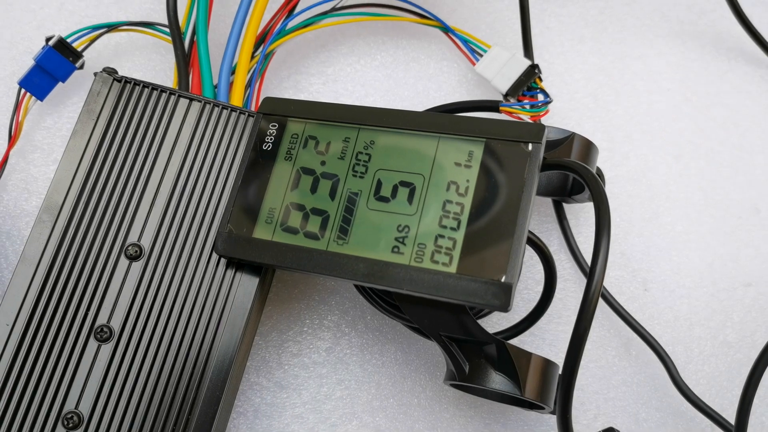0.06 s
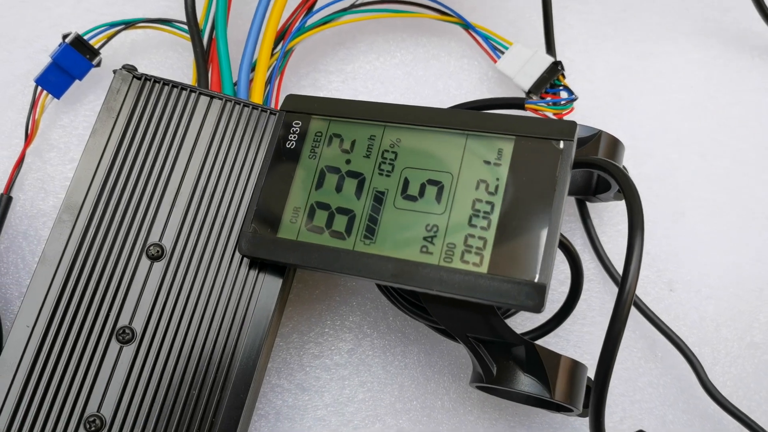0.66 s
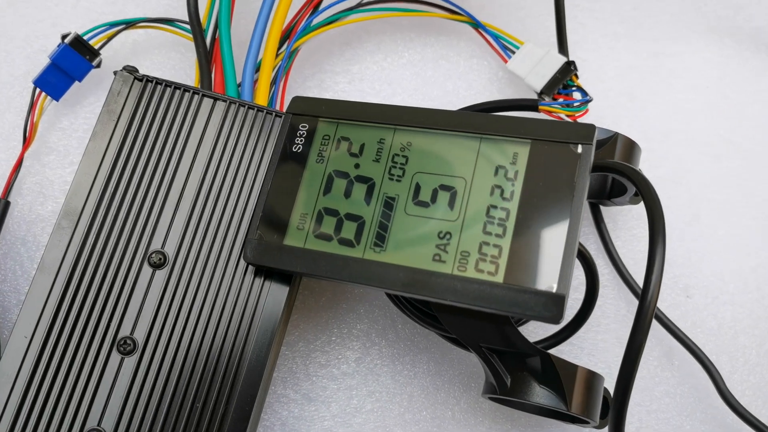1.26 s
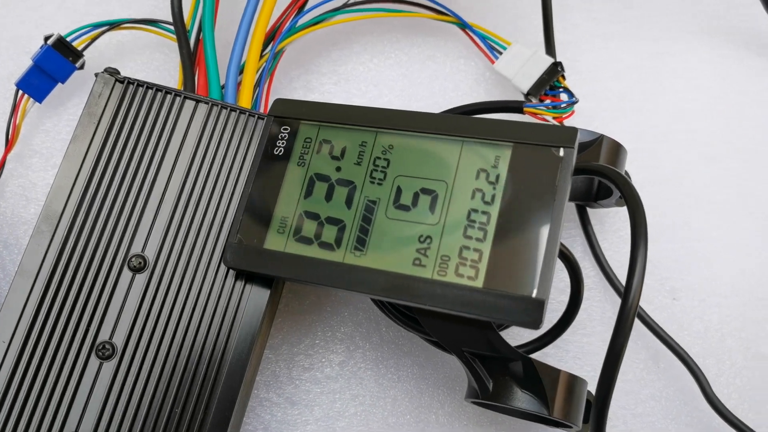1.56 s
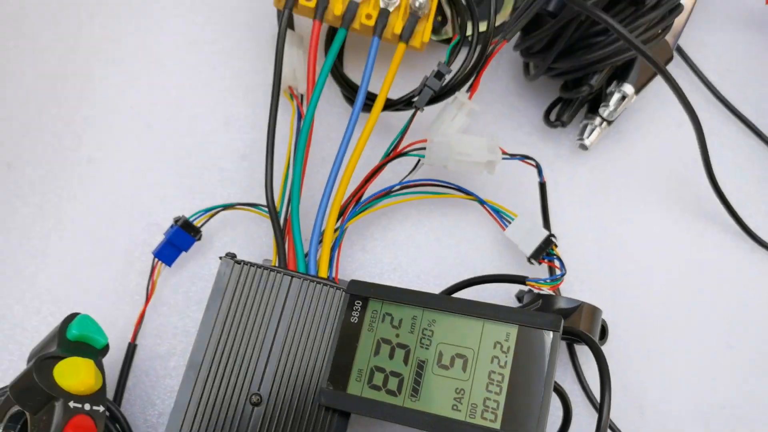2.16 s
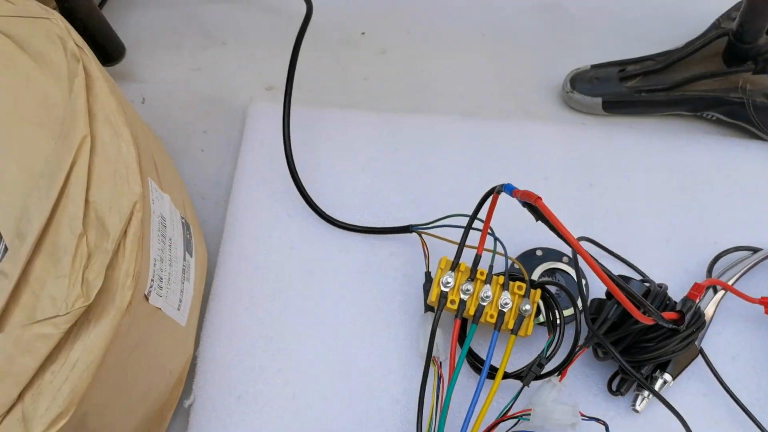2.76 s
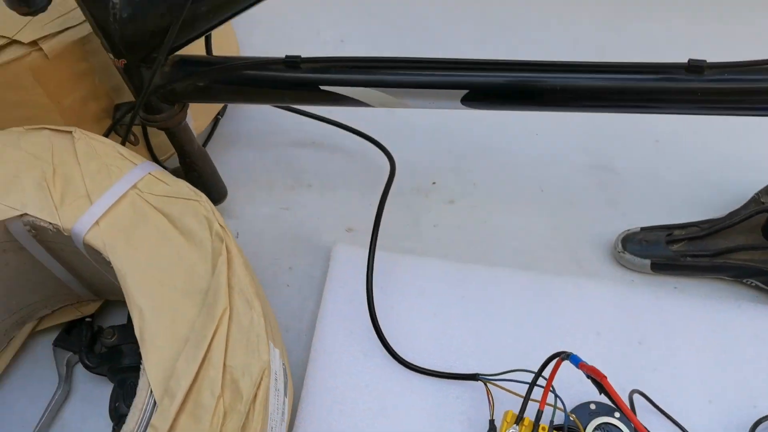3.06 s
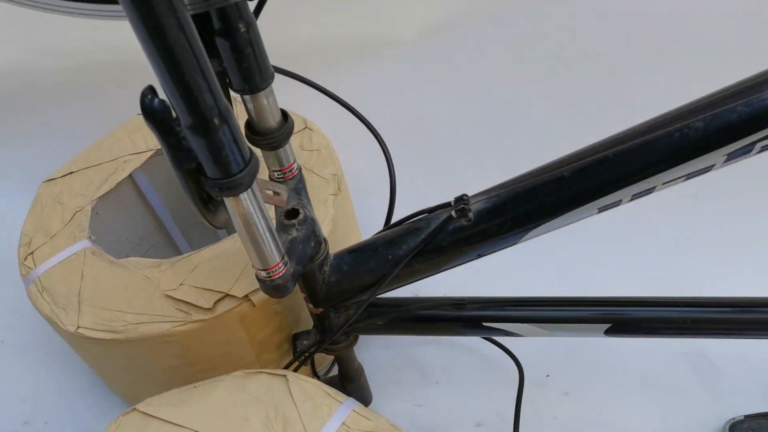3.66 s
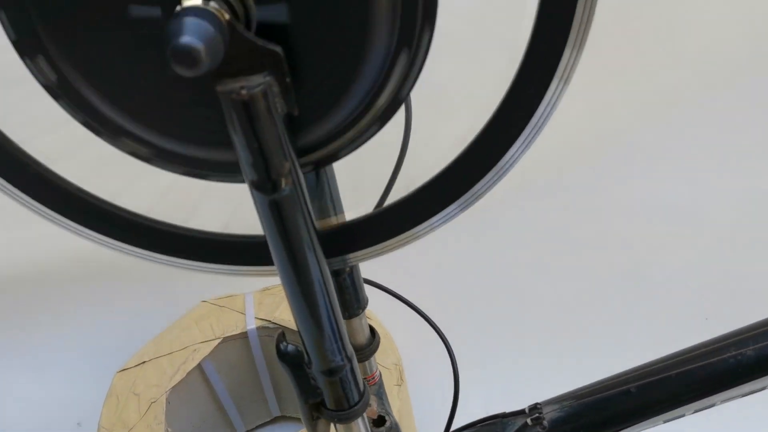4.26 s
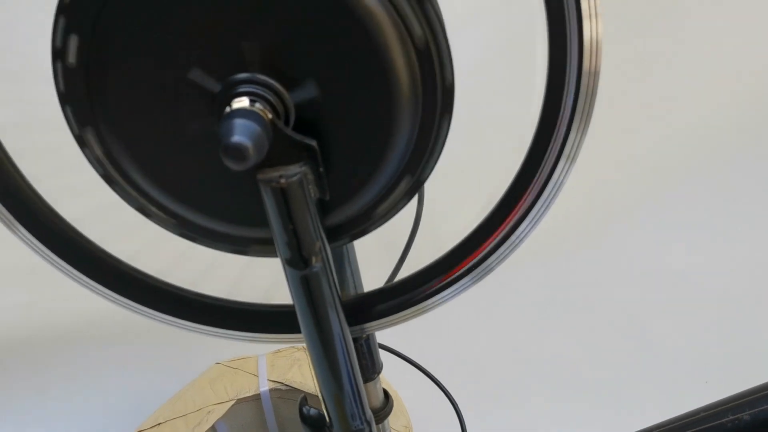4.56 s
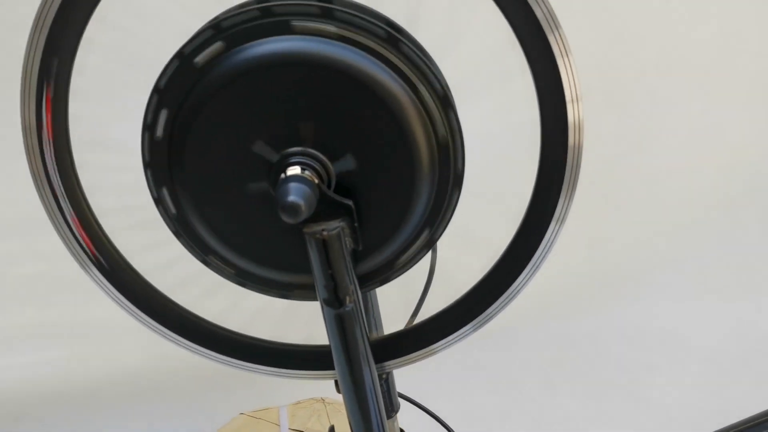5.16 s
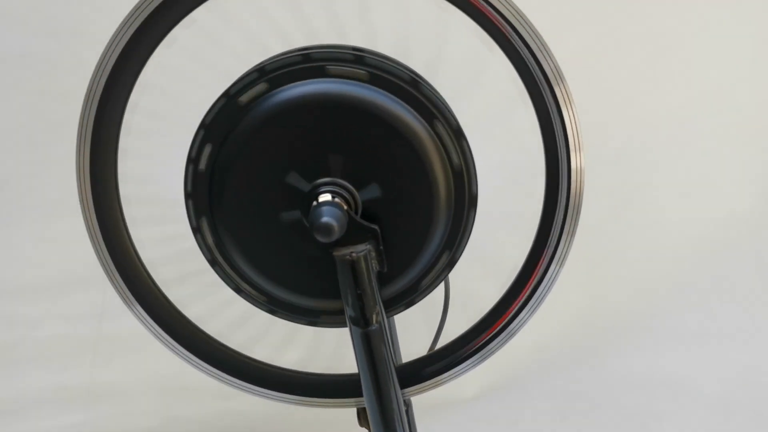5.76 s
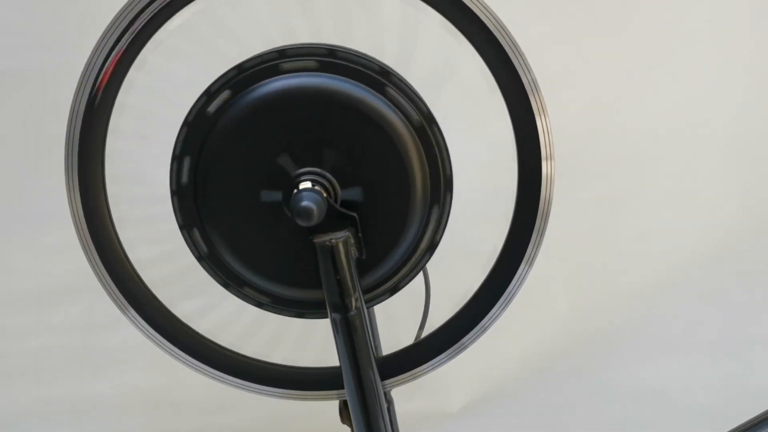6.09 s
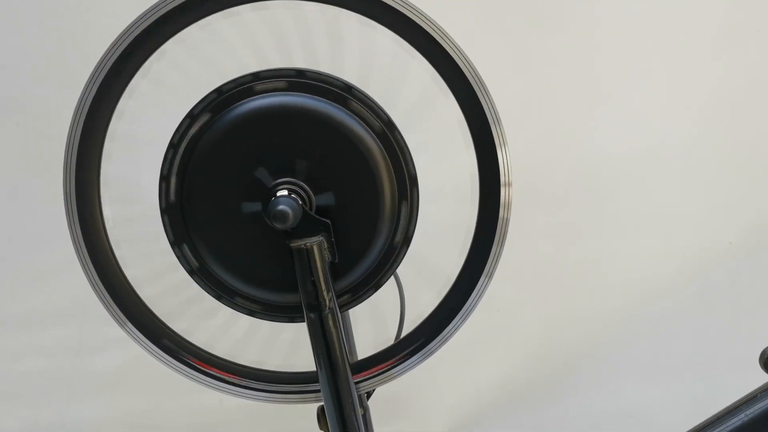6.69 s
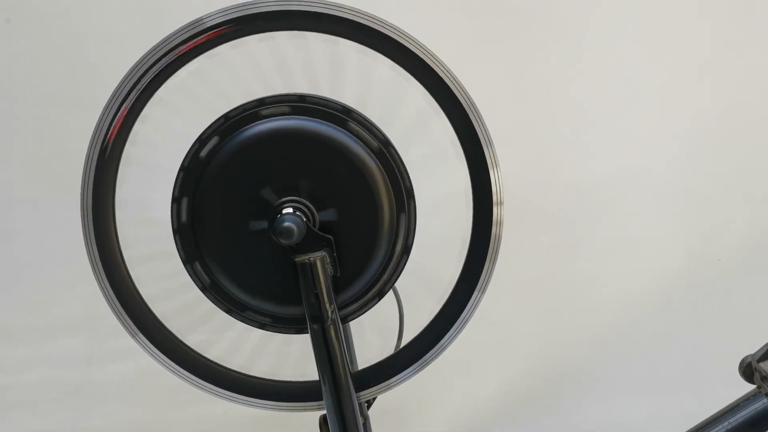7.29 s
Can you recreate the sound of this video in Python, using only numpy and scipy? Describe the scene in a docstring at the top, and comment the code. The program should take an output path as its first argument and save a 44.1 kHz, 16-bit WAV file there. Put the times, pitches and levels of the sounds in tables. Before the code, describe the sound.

An electric bicycle's hub motor spins a lifted wheel at a constant high speed in a small room. A steady hum, whines and a piercing high whistle sound over rushing air from the spokes, fine hiss and low rumble. The hand-held microphone moves closer, with a few dull bumps and one footstep. The whistle and rush grow louder, and two soft puffs of air hit the microphone.

```python
"""A steady hum, two whines and a piercing whistle sound over rushing air, a fine hiss and a low rumble.
An electric bicycle's hub motor is spinning its lifted wheel at top speed in a small room. The magnets
sing on whole multiples of the turning rate, the hub's shell whistles, and the spokes tear the air.
A hand-held microphone starts at the controller on the floor and is carried up close to the wheel,
with a few bumps and one footstep. There, two soft puffs of air from the wheel hit it."""
import sys
import numpy as np
from scipy import signal
from scipy.fft import rfft, irfft, next_fast_len
from scipy.io import wavfile
from scipy.ndimage import uniform_filter1d

SR = 44100
rng = np.random.default_rng(int(sys.argv[2]) if len(sys.argv) > 2 else 0)


def digitize_waveform(pressure):
    """Quantize a signal to 16-bit integers and store it at the path in sys.argv[1].

    Rows of a 2-D input are taken as channels; values are limited to [-1, 1].
    """
    field = np.atleast_2d(pressure).T
    bounded = np.clip(field, -1, 1)
    quanta = np.round(bounded * 32767).astype(np.int16)
    wavfile.write(sys.argv[1], SR, quanta)


N = 332073
T = np.arange(N) / SR
WHEEL_HZ = 14.148  # turns a second; a "multiple" below is a pitch divided by this rate

# The microphone's path (place 0: at the controller, 1: beside the hub, 2: facing it): time_s, path_m, place
WALK = [(0, 0.033, 0), (1.4, 0.05, 0.02), (1.9, 0.079, 0.015), (2.8, 0.39, 0.52), (3.5, 0.63, 1.4),
        (4.1, 0.59, 0.58), (4.9, .59, 1.43), (5.5, 0.49, 1.46), (6.5, 0.57, 1.9), (7.53, 0.54, 2)]
# The wheel starts far left and ends nearly ahead, so the right side lags less: time_s, lag_ms
RIGHT_LAG = [(0, 0.26), (2.2, 0.26), (3.1, 0.24), (4.5, 0.094), (5.3, .06), (6.2, 0.094), (7.53, 0.07)]

# The motor's four leading tones: multiple, left_minus_right_db
TONES = [(46, 3), (103, 3), (138, 3), (184, 0)]
# Their loudness along the walk: time_s, first_db, second_db, third_db, fourth_db
TONE_LEVELS = [(0, -49.5, -46, -58, -50.5), (1.85, -47.5, -50.5, -66, -51.5), (2.1, -53, -46, -57, -55),
               (2.8, -55, -55, -53, -49.5), (3.2, -62, -39.5, -49, -47), (3.65, -55, -57, -39.5, -44),
               (3.9, -52, -50, -43.5, -48), (4.35, -48, -52, -43, -45), (4.8, -50, -45, -45.5, -46),
               (5.4, -57, -45, -49.5, -52.5), (5.9, -50, -60, -46.5, -47.5), (6.6, -56, -53, -46, -64),
               (7.53, -48.5, -49, -49, -55)]
# Hum of the magnets and the motor's fixed core: multiple, controller_db, beside_db, facing_db
HUM_TONES = [(154, -75, -60, -65), (180, -60, -68, -71), (188, -60, -54, -55), (191, -66, -64, -71),
             (206, -68, -66, -71), (224, -61.5, -58, -61), (230, -54.5, -57, -62), (234, -68, -66, -70),
             (248, -69, -60, -65), (262, -69, -60, -66), (273, -64, -66, -71), (276, -67, -54, -55),
             (299, -72, -67, -69), (309, -62, -58, -59), (322, -57, -56, -57), (345, -74, -69, -67),
             (356, -73, -66, -64), (368, -70, -64, -64), (391, -72, -65, -65), (401, -71, -60.5, -63),
             (407, -80, -64, -66), (409, -85, -62, -68), (414, -71, -60, -64), (453, -70, -67, -69),
             (460, -57, -50, -58), (465, -70, -66, -70), (529, -57, -52, -59), (552, -63, -57, -63),
             (575, -69, -60, -67), (598, -76, -58, -67), (667, -61, -59, -59)]
# Boost of the whole hum: controller_db, beside_db, facing_db
HUM_BOOST = [2.0, 1.5, 0.0]
# Strength of each tone in the faint buzz: pitch_hz, controller_db, near_hub_db
BUZZ = [(1240, -71, -81), (1847, -63.5, -58), (2350, -75.5, -81), (2900, -86, -94), (3260, -91, -98),
        (3480, -74, -74), (4030, -84, -96), (4370, -74, -71), (4820, -95, -106), (4920, -85, -70.5),
        (5380, -91, -99), (5770, -80, -63.5), (5860, -98, -104)]
# Two tones that throb once a turn: multiple, level_db
THROB_TONES = [(252, -3.5), (258, 0)]
# Their throb is deep from the side and evens out facing the hub: time_s, level_db, depth_fraction
THROB_LEVELS = [(0, -42.5, 0.3), (1.8, -46, 0.45), (2.8, -46.5, 0.4), (4.3, -46.5, 0.2), (5.3, -49, 0.27),
                (7.53, -51, 0.1)]
# Whines around 22 and 27 times the rate of the motor's current: multiple, level_db
LOW_WHINE = [(502, -11), (506, 0), (510, -10), (514, -16)]
HIGH_WHINE = [(607, -17), (619, -20), (621, 0), (623, -20), (635, -17)]
# Clusters of tones in the shell's whistle: centre_multiple, spread_multiples, side_db, facing_db
WHISTLE_CLUSTERS = [(964, 2, -26, -33), (983, 2, -30, -30), (989, .4, -21, -21), (1014.5, 2, -15, -24),
                    (1022, .4, -16, -19), (1024.5, .6, -1, -2), (1028, .4, -10, -15), (1033, 2, -16, -19),
                    (1035, .4, 0, 0), (1037.3, 1.2, -8, -9), (1042.4, .8, -3, -1), (1045, 1.2, -8, -8),
                    (1048, .4, -10, -14), (1055, 1.8, -14, -23), (1060, .8, -22, -32), (1065, .4, -25, -38),
                    (1081, .4, -22, -27), (1089, .4, -22, -25), (1099, 2.5, -26, -29), (1108, 3, -28, -33)]
# Loudness as the microphone passes through each sound's beams: time_s, left_db, right_db
LOW_WHINE_LEVELS = [(0.0, -41.5, -51), (1.56, -50.5, -46.5), (1.76, -44, -50), (1.96, -53, -58),
                    (2.08, -40, -46), (2.56, -48, -55), (2.88, -38.5, -50), (3.44, -35.5, -58),
                    (3.56, -43, -51), (3.84, -27, -41), (4.44, -46, -44), (5.28, -73, -52),
                    (5.72, -52, -57), (6.2, -42, -47), (6.32, -46, -44.5), (7.53, -44, -41.5)]
HIGH_WHINE_LEVELS = [(0.0, -44, -57), (1.28, -50, -64), (1.48, -40, -54.5), (1.64, -48.5, -60),
                     (2.96, -37, -60), (3.64, -25.5, -54), (4.0, -31, -36), (4.12, -70, -46),
                     (4.56, -34, -44), (5.44, -35.5, -42), (5.8, -32.5, -62), (6.24, -28, -49),
                     (6.44, -30, -50.0), (6.56, -37, -51), (7.53, -33, -54)]
WHISTLE_LEVELS = [(0.0, -30, -29), (0.4, -27, -29), (1.04, -33.5, -33), (1.6, -31, -31), (2.76, -26, -28.5),
                  (2.92, -22.5, -33), (3.16, -21, -28), (3.48, -14.5, -25.5), (3.85, -15, -22),
                  (4.1, -20, -24), (4.45, -16, -21), (4.95, -19, -17.5), (5.27, -20.5, -19),
                  (5.85, -17.5, -21), (6.05, -17.5, -22), (6.3, -18.5, -19), (6.62, -14.5, -18),
                  (7.0, -17, -19), (7.53, -15.5, -19.5)]
# The whistle's flutter, deepest as the microphone passes the hub: time_s, depth_fraction
WHISTLE_FLUTTER = [(0, 0.083), (1.5, .02), (4.35, 0.063), (4.65, 0.48), (4.95, 0.38), (5.2, .05),
                   (7.53, .03)]

# Tone colours of the wash, airy rush (far and near), fine high hiss, rumble and puffs:
# pitch_hz, relative_db
WASH_COLOUR = [(100, -17), (220, 3.5), (380, 9), (520, -9), (750, -32)]
RUSH_FAR_COLOUR = [(100, -102), (330, -79.5), (450, -72.5), (550, -75.5), (700, -67.5), (850, -66.5),
                   (1050, -71.5), (1270, -77.5), (1530, -78.5), (1750, -69.5), (2050, -73.5), (2400, -74),
                   (3050, -86), (3400, -81.5), (3700, -80), (4100, -94), (4400, -83.5), (4750, -105),
                   (5100, -93.5), (6300, -102), (9000, -115)]
RUSH_NEAR_COLOUR = [(100, -93), (330, -71.5), (520, -68), (680, -62.5), (850, -62), (1080, -69),
                    (1250, -67.5), (1850, -66), (2400, -75), (3050, -81.5), (3400, -83.5), (3700, -78),
                    (4050, -89), (4400, -81), (4700, -92), (5050, -78), (5400, -88), (6300, -101),
                    (9000, -115)]
HISS_COLOUR = [(4500, -120), (6200, -83.5), (6800, -76), (7300, -72), (8200, -78), (8800, -66), (9400, -67),
               (10100, -87), (11500, -83), (12800, -77), (13700, -65), (14600, -51), (15200, -68),
               (15600, -64.5)]
RUMBLE_COLOUR = [(10, -102), (30, -78), (40, -70), (55, -69), (85, -65.5), (125, -72.5), (170, -69),
                 (250, -77.5), (400, -97), (900, -115)]
PUFF_COLOUR = [(10, -22), (30, -2), (55, -2), (100, -9), (200, -29), (500, -60)]
# Loudness of the wash, rush, hiss and rumble at each place: controller_db, beside_db, facing_db
WASH_LEVELS = (-63.5, -47, -61)
RUSH_LEVELS = (-39.5, -33, -36)
HISS_LEVELS = (-36.5, -29, -36)
RUMBLE_LEVELS = (-44, -46.5, -52)
# The note of air swirling off the spokes moves with the listening angle and narrows in line with the rim:
# time_s, pitch_hz, whoosh_db, whirr_db
SWIRL_NOTE = [(0, 950, -47, -62), (1.0, 1020, -44, -57), (1.5, 1052, -44.5, -54), (1.95, 900, -44.5, -42.5),
              (2.25, 835, -52, -56), (2.5, 810, -44.5, -42), (2.9, 810, -48, -54), (3.1, 880, -42.5, -51),
              (3.3, 861, -41, -35), (3.45, 847, -41, -41.5), (3.6, 823, -46, -35.5), (3.9, 781, -36.5, -40),
              (4.1, 832, -36, -43), (4.45, 827, -40, -41), (4.75, 854, -35.5, -39.5),
              (5.05, 852, -40, -41.5), (5.5, 834, -39.5, -48.5), (7.53, 840, -44, -51)]
# How alike a noise is on the left and right: pitch_hz, likeness_fraction
LIKENESS = [(25, .6), (60, .9), (125, .94), (250, .9), (500, .84), (900, .78), (1300, .65), (1750, .55),
            (2300, .2), (15000, 0)]
# Which side a noise leans to: pitch_hz, left_minus_right_db
BALANCE = [(25, 5), (60, -2.5), (125, 0), (500, 1), (1000, 2), (2000, 4.5), (4000, -8.5), (8000, 23.5),
           (11000, -16.5), (15000, 9.5)]
# Handling bumps and a footstep with its scuff: start_s, level_db, pitch_hz, width_octaves, decay_s
KNOCKS = [(1.99, -35, 85, 0.53, 0.068), (2.453, -31, 125, .5, 0.017), (2.857, -33, 720, 0.36, 0.006),
          (2.945, -30.5, 380, 0.57, 0.044), (2.964, -24.5, 250, 0.74, 0.065),
          (2.972, -34, 555, 0.16, 0.041), (3.001, -35, 182, 0.33, 0.042), (3.005, -32.5, 496, 0.18, 0.037),
          (3.025, -30, 597, .4, 0.034), (3.045, -40, 140, .6, .04), (3.088, -36, 310, 0.47, 0.034)]
# Puffs of the wheel's draught: peak_s, length_s, level_db
PUFFS = [(4.94, 0.25, -39), (5.206, 0.14, -42)]


def gain_of(db):
    """Turns decibels into a number to multiply a sound by."""
    return 10 ** (np.asarray(db) / 20)


def evened(x):
    """Scales a signal to an average power of 1."""
    return x / np.sqrt(np.mean(x ** 2) + 1e-20)


def follow(rows):
    """Joins a table's timed points with straight lines, giving one curve for each column after time."""
    times, *columns = np.transpose(rows)
    return np.array([np.interp(T, times, column) for column in columns])


def at_place(place, values):
    """Blends the values at the controller, beside the hub and facing the hub."""
    return np.interp(place, np.arange(len(values)), values)


def at_pitch(points, hz):
    """Reads a table between its pitches, spaced as on a keyboard."""
    pitches, values = np.transpose(points)
    return np.interp(np.log(hz + 1), np.log(pitches + 1), values)


def drift(rate_hz, count=12):
    """A random wander made of slow waves, the fastest at rate_hz."""
    t = T[::256]
    rates = np.geomspace(rate_hz / 10, rate_hz, count)
    waves = sum(np.sin(2 * np.pi * (hz * t + rng.random())) / np.sqrt(hz) for hz in rates)
    return np.interp(T, t, evened(waves))


def waver(depth_db):
    """As the hand moves, each side slips through the room's loud and quiet spots."""
    return gain_of(depth_db * np.array([drift(rate_hz=10), drift(rate_hz=11)]))


def noise(colour):
    """Stereo noise whose two sides are alike in the bass and unrelated in the treble."""
    size = next_fast_len(N)
    hz = np.fft.rfftfreq(size, 1 / SR)
    left, other = rfft(rng.standard_normal((2, size)))
    likeness = at_pitch(LIKENESS, hz)
    right = likeness * left + np.sqrt(1 - likeness ** 2) * other
    lean = gain_of(at_pitch(BALANCE, hz) / 2)
    spectrum = np.array([left * lean, right / lean]) * gain_of(at_pitch(colour, hz))
    return evened(irfft(spectrum, size)[:, :N])


def one_turn(multiples, db, size=65536):
    """The sound wave of one wheel turn, a tone on each multiple; complex, so its phase is easy to shift."""
    tones = np.zeros(size, complex)
    phases = np.exp(2j * np.pi * rng.random(size))
    tones[np.round(multiples).astype(int)] = gain_of(db)
    return np.fft.ifft(tones * phases) * size * np.sqrt(2)


def radiate(wave, clock, walked, echo_db, lag_s=0, right_factor=1j, echo_count=3):
    """Repeats one turn, heard directly and off the walls; walking bends each path's pitch (Doppler)."""
    sound_m_per_s = 343
    echo_gain = gain_of(echo_db) / np.sqrt(echo_count)
    # 1j: the right side is shifted a quarter cycle, so the tone sounds wide
    sides = (wave.real, (wave * right_factor).real)
    out = np.zeros((2, N))
    for channel, direct_s, heard in zip(out, (0, lag_s), sides):
        echoes = [(echo_gain, rng.uniform(.002, .03), rng.uniform(-1, 1)) for _ in range(echo_count)]
        for gain, delay_s, direction in [(0.86, direct_s, 0.98)] + echoes:
            sent_s = clock - delay_s + direction / sound_m_per_s * walked
            index = (WHEEL_HZ * len(wave) * sent_s).astype(int) % len(wave)
            channel += gain * heard[index]
    return out / np.sqrt(1 + gain_of(echo_db) ** 2)


def beamed(x, level_db, window=9000):
    """Evens out slow swells, then gives each side the loudness of the beam of sound it stands in."""
    power = uniform_filter1d(x ** 2, window, axis=1)
    power = uniform_filter1d(power, window, axis=1)
    return x / np.sqrt(power + 0.03 * power.mean()) * gain_of(level_db)


def from_wheel(x, lag_s):
    """Delays the right side so that a sound seems to come from the wheel."""
    return np.array([x[0], np.interp(T - lag_s, T, x[1])])


def leading_tones(clock, walked, lag_s):
    """Clean ringing tones of the motor, each swelling in its own direction."""
    out = np.zeros((2, N))
    for (multiple, lean_db), level_db in zip(TONES, follow(TONE_LEVELS)):
        wave = one_turn([multiple], 0)
        tone = radiate(wave, clock, walked, echo_db=-9, lag_s=lag_s, right_factor=0.83)
        sides_db = level_db + np.array([[lean_db], [-lean_db]]) / 2
        out += beamed(tone, sides_db) * waver(depth_db=0.87)
    return out


def magnet_hum(clock, walked, place, neighbour_db=-22):
    """The magnets' overtones change from place to place; unequal magnets add nearby tones and a buzz."""
    multiples, *mixes = np.transpose(HUM_TONES)
    neighbours = multiples[:, None] + np.array([-4, -2, -1, 1, 2, 4])
    buzz_multiples = np.arange(85, 440)
    buzz_hz, far_db, near_db = np.transpose(BUZZ)
    out = np.zeros((2, N))
    for spot, (db, buzz_db) in enumerate(zip(mixes, (far_db, near_db, near_db))):
        buzz = one_turn(buzz_multiples, np.interp(buzz_multiples * WHEEL_HZ, buzz_hz, buzz_db))
        wave = buzz + one_turn(multiples, db) + one_turn(neighbours, db[:, None] + neighbour_db)
        share = np.clip(1 - abs(place - spot), 0, 1) ** (2 / 3)
        out += share * gain_of(HUM_BOOST[spot]) * radiate(wave, clock, walked, echo_db=-10)
    return out * gain_of([[.7], [-.7]]) * waver(depth_db=1.5)


def throbbing(clock, walked, sway_radians=0.94):
    """The motor's slightly uneven air gap makes two tones swell and sway in pitch once a turn."""
    wave = one_turn(*np.transpose(THROB_TONES))
    angle = 2 * np.pi * np.arange(len(wave)) / len(wave)
    swaying = wave * np.exp(1j * sway_radians * np.sin(angle))
    level_db, depth = follow(THROB_LEVELS)
    swell = 1 + depth * np.cos(2 * np.pi * (WHEEL_HZ * clock + .1))
    tones = radiate(swaying, clock, walked, echo_db=-8)
    return beamed(tones * swell, level_db) * waver(depth_db=1.5)


def whine(tones, levels, clock, walked, skirt_db, skirt_hz, echo_db, waver_db):
    """Strong electrical tones in a skirt of weaker ones, spaced one turning rate apart."""
    multiples, db = np.transpose(tones)
    centre = multiples[np.argmax(db)]
    steps = np.arange(-70, 71)
    falloff_db = 10 * np.log10(1 + (steps * WHEEL_HZ / skirt_hz) ** 4)
    wave = one_turn(multiples, db) + one_turn(centre + steps, skirt_db - falloff_db)
    return beamed(radiate(wave, clock, walked, echo_db), follow(levels)) * waver(waver_db)


def shell_whistle(clock, walked, place, centre_hz=14640, skirt_hz=600, throb=0.066):
    """A row of high tones, loud only where the hub's shell rings, and purest facing the hub."""
    multiples = np.arange(930, 1112)
    centres, spreads, side_db, facing_db = np.transpose(WHISTLE_CLUSTERS)
    clusters = np.exp(-((multiples[:, None] - centres) / spreads) ** 2)
    skirt = 1 / (1 + ((multiples * WHEEL_HZ - centre_hz) / skirt_hz) ** 4)
    purity = np.clip((place - 1.34) / .3, 0, 1)
    shrill = np.zeros((2, N))
    for db, skirt_db, share in ((side_db, -32, 1 - purity), (facing_db, -37, purity)):
        power = clusters @ gain_of(db) ** 2 + skirt * gain_of(skirt_db) ** 2
        wave = one_turn(multiples, 10 * np.log10(power))
        shrill += np.sqrt(share) * radiate(wave, clock, walked, echo_db=-6)
    angle = 2 * np.pi * WHEEL_HZ * (clock - 4.623)
    flutter = np.cos(2 * angle) - np.sin(4 * angle) / 2  # a lopsided swell, twice a turn
    pulse = (1 + throb * np.cos(angle)) * (1 + follow(WHISTLE_FLUTTER) * flutter)
    return beamed(shrill * pulse, follow(WHISTLE_LEVELS))


def air_wash(place):
    """The low wash of air that the wheel throws outward."""
    return noise(WASH_COLOUR) * gain_of(at_place(place, WASH_LEVELS))


def resonate(x, hz, width_hz):
    """Makes a sound ring in a band around the moving pitch hz."""
    turn = np.exp(2j * np.pi * np.cumsum(hz) / SR)
    feedback = np.exp(-np.pi * width_hz / SR)
    return 2 * (turn * signal.lfilter([1 - feedback], [1, -feedback], x / turn)).real


def spokes(clock, place, throb=0.029, flutter_db=0.75, whoosh_width_hz=210, whirr_width_hz=42):
    """Spokes tear the air into a broad rush and a hollow, whirring note, throbbing slightly each turn."""
    near = np.minimum(place, 1) ** 1.96
    rush = np.sqrt(1 - near) * noise(RUSH_FAR_COLOUR) + np.sqrt(near) * noise(RUSH_NEAR_COLOUR)
    rush *= gain_of(at_place(place, RUSH_LEVELS))
    note_hz, whoosh_db, whirr_db = follow(SWIRL_NOTE)
    note = np.zeros((2, N))
    for db, width_hz in ((whoosh_db, whoosh_width_hz), (whirr_db, whirr_width_hz)):
        swirls = rng.standard_normal((2, N)) + 1.47 * rng.standard_normal(N)  # partly shared by both sides
        ringing = resonate(resonate(swirls, note_hz, width_hz), note_hz, width_hz)
        note += beamed(ringing, db, window=5000)
    swell = 1 + throb * np.sin(2 * np.pi * WHEEL_HZ * clock)
    flutter = gain_of(flutter_db * drift(rate_hz=16))
    return (rush + note * gain_of([[1.3], [-1.7]])) * swell * flutter


def high_hiss(clock, place, throb=0.32):
    """Fine, high hiss swelling twice a turn."""
    swell = 1 + throb * np.sin(4 * np.pi * WHEEL_HZ * clock)
    return noise(HISS_COLOUR) * gain_of(at_place(place, HISS_LEVELS)) * swell


def room_rumble(place, swell_db=1.56):
    """The room's low rumble swells at random and is strongest near the floor."""
    return noise(RUMBLE_COLOUR) * gain_of(at_place(place, RUMBLE_LEVELS) + swell_db * drift(rate_hz=5))


def bumps_and_footstep(rise_s=0.0037):
    """The hand and a foot make dull bursts of noise that die away quickly."""
    out = np.zeros(N)
    t = T[:SR // 4]
    hz = np.fft.rfftfreq(len(t), 1 / SR)
    for start_s, level_db, pitch_hz, width_octaves, decay_s in KNOCKS:
        colour = np.exp(-.5 * (np.log2((hz + 1) / pitch_hz) / width_octaves) ** 2)
        burst = irfft(colour * rfft(rng.standard_normal(len(t))), len(t))
        bump = burst * (1 - np.exp(-t / rise_s)) * np.exp(-t / decay_s)
        out[round(start_s * SR):][:len(t)] += gain_of(level_db) * bump / abs(bump).max()
    return out * gain_of([[1.5], [0.1]])


def draught(left_db=-18):
    """Soft puffs of air from the wheel hit mainly the microphone's right side."""
    puffs = sum(gain_of(db) * np.exp(-(2 * (T - peak_s) / length_s) ** 2) for peak_s, length_s, db in PUFFS)
    return noise(PUFF_COLOUR) * puffs * gain_of([[left_db], [0]])


def scene():
    """Motor, air and room as heard along the walk."""
    walked, place = follow(WALK)
    walked = uniform_filter1d(walked, size=12000) + 0.0022 * drift(rate_hz=6.3)  # the hand sways
    clock = T + 1.2e-5 * drift(rate_hz=1.1)  # the wheel's speed is almost perfectly steady
    lag_s = follow(RIGHT_LAG)[0] / 1000
    low_whine = whine(LOW_WHINE, LOW_WHINE_LEVELS, clock, walked,
                      skirt_db=-22.5, skirt_hz=121, echo_db=6.5, waver_db=3.0)
    high_whine = whine(HIGH_WHINE, HIGH_WHINE_LEVELS, clock, walked,
                       skirt_db=-26.5, skirt_hz=119, echo_db=-13, waver_db=1.5)
    motor = leading_tones(clock, walked, lag_s) + magnet_hum(clock, walked, place)
    motor += throbbing(clock, walked) + low_whine + high_whine + shell_whistle(clock, walked, place)
    air = from_wheel(air_wash(place) + spokes(clock, place), lag_s)
    return motor + air + high_hiss(clock, place) + room_rumble(place) + draught() + bumps_and_footstep()


def record(dry, cutoff_hz=15740):
    """Cuts away the very highest treble."""
    low_pass = signal.firwin(1023, cutoff_hz, window=("kaiser", 9), fs=SR)
    return signal.oaconvolve(dry, low_pass[None], "same")


dry = scene()
out = record(dry)
digitize_waveform(out)
```